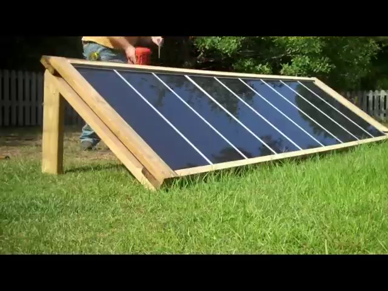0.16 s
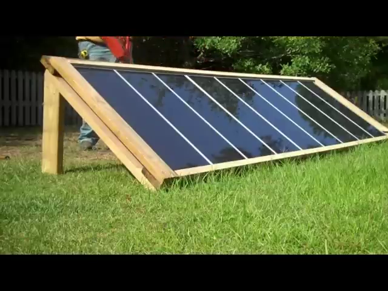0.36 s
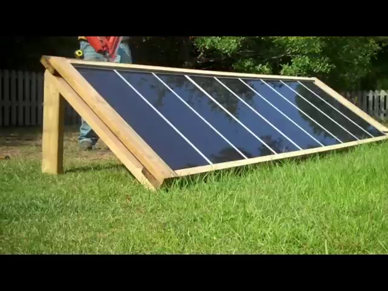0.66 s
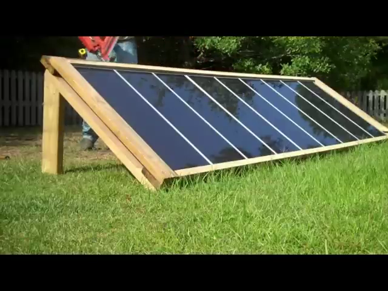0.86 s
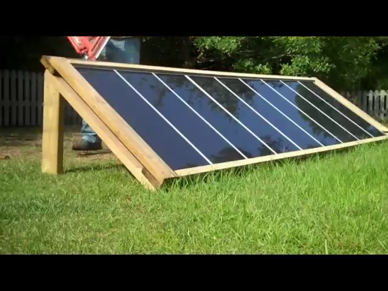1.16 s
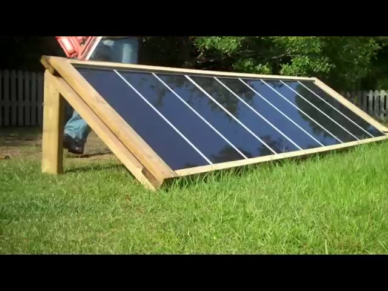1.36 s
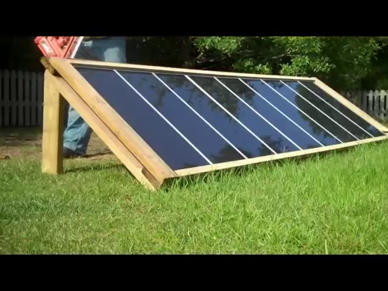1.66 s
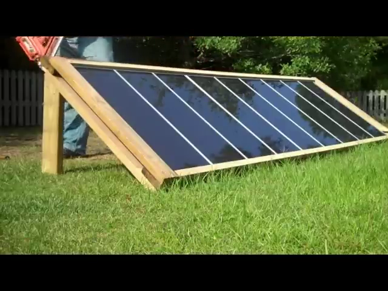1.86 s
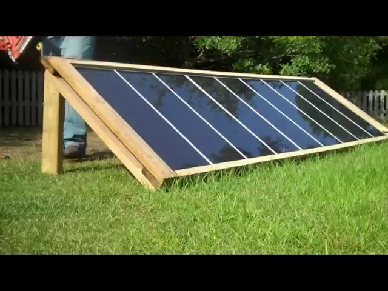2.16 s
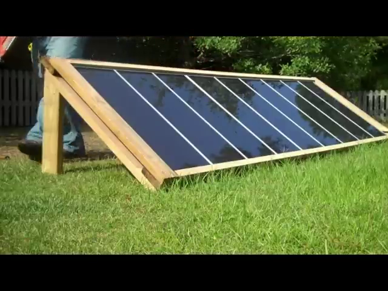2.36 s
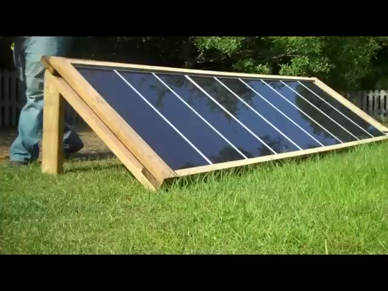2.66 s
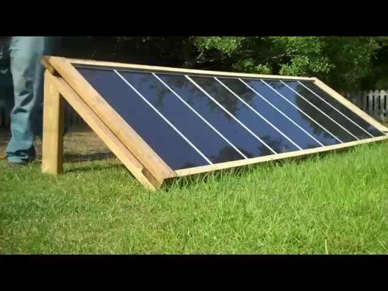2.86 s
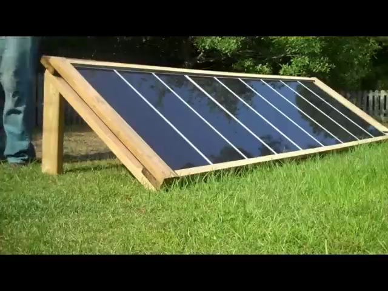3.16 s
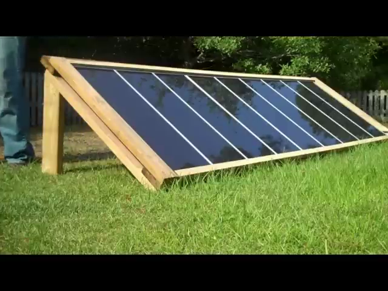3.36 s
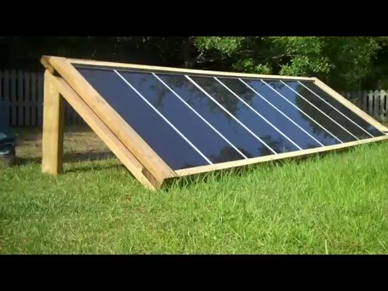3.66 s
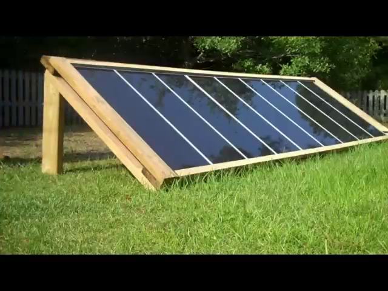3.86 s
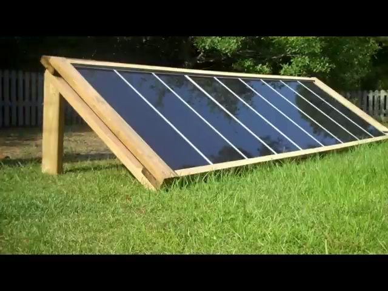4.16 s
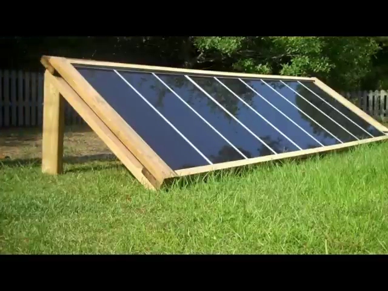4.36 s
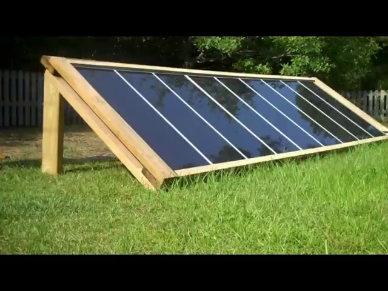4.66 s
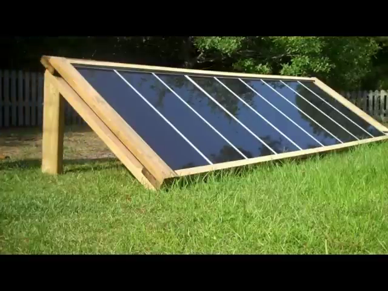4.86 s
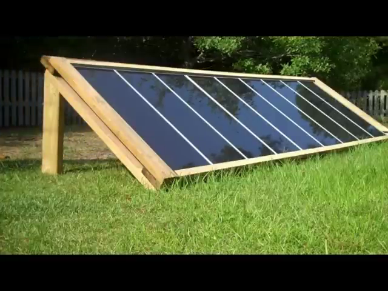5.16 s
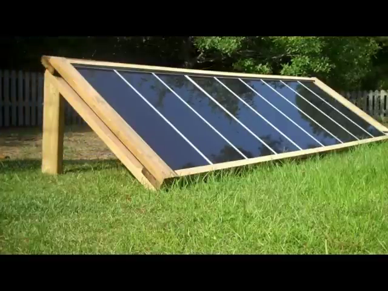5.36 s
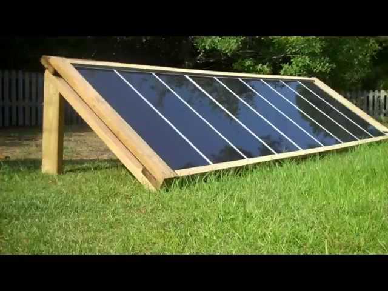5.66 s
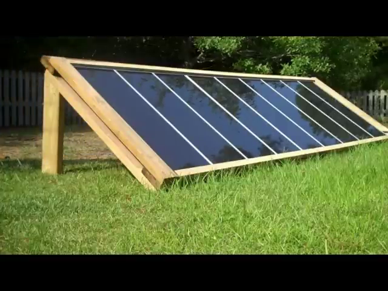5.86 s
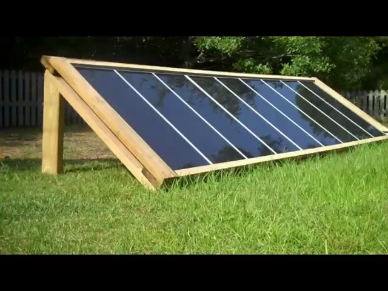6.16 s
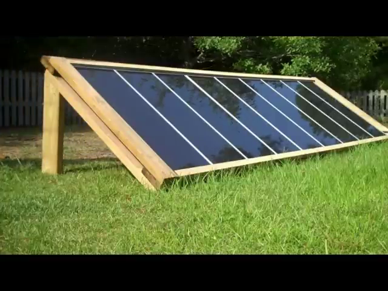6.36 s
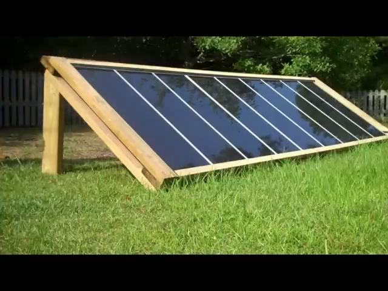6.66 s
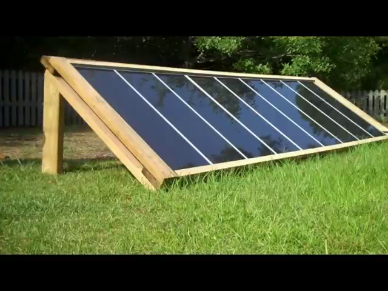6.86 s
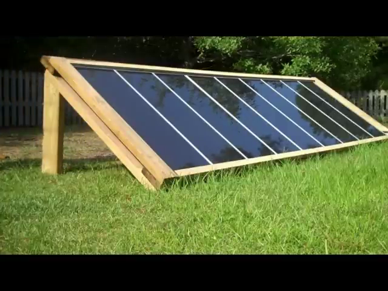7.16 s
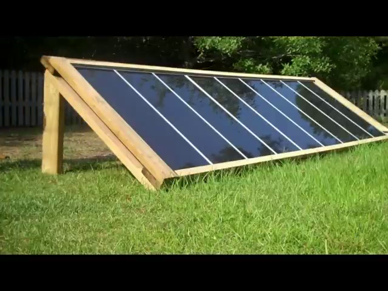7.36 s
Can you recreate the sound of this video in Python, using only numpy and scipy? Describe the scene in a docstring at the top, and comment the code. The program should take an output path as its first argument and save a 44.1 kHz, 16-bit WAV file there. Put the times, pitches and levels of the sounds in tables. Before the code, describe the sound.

A calm backyard with faint hum, hiss and high insect-like singing. A small hard catch snaps early, then shoes swish lightly in grass. Wood and hard gear are handled: a quick knock, a fluttering rattle, a sharper clatter, and finally two strong bright double clacks close together, with loose rattles after. The sound is dry, with a slight airy outdoor tail and treble-heavy microphones.

```python
"""On a lawn beside a timber-framed panel, someone walks off through the grass and handles wood and hard gear:
short scrapes, then two sharp double clacks with small rattles. Contacts are noise bursts exciting decaying
wood modes; scrapes and steps are dense random grains. Behind lie a distant outdoor hum, hiss, a thin whine
and an insect that stops; the two microphone capsules ring at different treble pitches."""
import sys
import numpy as np
from scipy import signal
from scipy.fft import rfft, irfft, next_fast_len
from scipy.io import wavfile
from scipy.ndimage import map_coordinates

SR = 44100
rng = np.random.default_rng(int(sys.argv[2]) if len(sys.argv) > 2 else 0)


def to_wav(sig):
    """Store sig (one row per channel, or 1-D mono) as 16-bit WAV at the path in sys.argv[1].

    Samples outside -1..1 are clipped; the rate is SR.
    """
    pcm = np.clip(np.atleast_2d(sig), -1, 1) * 32767
    pcm = np.round(pcm).astype(np.int16)
    wavfile.write(sys.argv[1], SR, pcm.T)  # frames by channels


N = 330485  # length in samples


def amp(db):
    """Amplitude ratio of a level: twenty decibels per factor of ten."""
    return 10 ** (np.asarray(db) / 20)


def decay(t, t60_s):
    """Exponential decay: the level falls 60 dB in t60_s."""
    return amp(-60 * t / t60_s)


def unit(x):
    """Normalization to an rms of 1."""
    return x / np.sqrt(np.mean(x ** 2) + 1e-20)


def along(points, hz):
    """Interpolation of (frequency_hz, value) points on a logarithmic frequency axis."""
    point_hz, value = np.transpose(points)
    return np.interp(np.log(hz + 1), np.log(point_hz + 1), value)


def curve(rows):
    """Linear interpolation of (time_s, value) rows, one value per sample."""
    return np.interp(np.arange(N) / SR, *np.transpose(rows))


def wobble(rate):
    """Slow random modulation: a smooth curve through random knots, rate of them a second."""
    knots = rng.standard_normal(int(N * rate / SR) + 4)
    return map_coordinates(knots, [np.arange(N) * rate / SR])


def filtered(x, response):
    """Linear filtering: the spectrum is multiplied by a complex response of frequency."""
    n = x.shape[-1]
    padded = next_fast_len(n + 4096, True)
    hz = np.fft.rfftfreq(padded, 1 / SR)
    return irfft(rfft(x, padded) * response(hz), padded)[..., :n]


def coloured(x, spectrum):
    """Spectral shaping by (frequency_hz, level_db) points, then normalization to rms 1."""
    return unit(filtered(x, lambda hz: amp(along(spectrum, hz))))


def placed(x, lead_ms):
    """Interaural-style time difference: the left leads the right by lead_ms (negative: right leads)."""
    sides = np.array([[1], [-1]])
    return filtered(x, lambda hz: np.exp(1j * np.pi * hz * lead_ms / 1000 * sides))


def band(centre_hz, width_hz):
    """Band-limited noise: independent on each side, with a bell-shaped response, at rms 1."""
    bell = lambda hz: 1 / (1 + ((hz - centre_hz) / width_hz * 2) ** 2)
    return unit(filtered(rng.standard_normal((2, N)), bell))


def strokes(rows):
    """Amplitude envelope: a half-sine swell for each (start_s, length_s, level_db) row."""
    t = np.arange(N) / SR
    swell = lambda start, length: np.sin(np.pi * np.clip((t - start) / length, 0, 1))
    return sum(amp(db) * swell(start, length) for start, length, db in rows)


def grains(rate, spread_db):
    """Random impulses: tiny catches of uneven size, on average rate of them a second."""
    struck = rng.random(N) < rate / SR
    return struck * rng.standard_normal(N) * amp(spread_db * rng.random(N))


def add(track, start_s, sound):
    """Superposition: mix a sound into the track, cut at the track's end."""
    part = track[:, round(start_s * SR):][:, :sound.shape[-1]]
    part += sound[:, :part.shape[-1]]


def near(hz, centre_hz, octaves):
    """Resonance bell: Gaussian in octaves about a centre."""
    return np.exp(-(np.log2((hz + 1) / centre_hz) / octaves) ** 2)


def contact_snap(t, hard_db, soft_db, centre_hz, t60_s):
    """Contact stiffness sets brightness: chattering noise, as rows for direct, left and right sound."""
    # colour of the snap: frequency_hz, density_db
    snap_colour = [(100, -24), (500, -8), (1100, 3), (2400, -2), (2900, 2), (3280, 2), (3800, 0),
                   (4900, 0.5), (6100, 2), (7100, -1), (8500, 0), (11000, 2), (13500, 10), (15500, -19)]
    # scattering off nearby boards: frequency_hz, scattered_over_direct_db
    scattering = [(1000, -8), (2200, 1.5), (4000, -3.5), (6000, -1.5), (8500, -13), (12000, -4)]
    # the further the snap outweighs the wood, the harder and brighter the contact
    hardness_db_per_octave = -3 + 6.5 * np.tanh((hard_db - soft_db) / 9.5)

    def response(hz):
        tilt_db = hardness_db_per_octave * np.log2(np.clip(hz, 2500, 12000) / centre_hz)
        # the part that is touched adds one broad resonance
        touched_db = 9 * near(hz, centre_hz, octaves=0.19)
        turn = np.arctan(amp(along(scattering, hz)))
        shares = np.array([np.cos(turn), np.sin(turn), np.sin(turn)])
        return amp(along(snap_colour, hz) + tilt_db + touched_db) * shares

    chatter = unit(filtered(rng.standard_normal((3, len(t))), response))
    onset = 1 - np.exp(-t / (0.016 * t60_s))
    return amp(hard_db + 2) * onset * decay(t, t60_s) * chatter


def wood_body(t, soft_db, pitch_hz):
    """Modal excitation: a blow drives the modes near its favoured pitch most, with a dry crunch."""
    # modes of the struck wood: frequency_hz, level_db, t60_s
    wood_modes = [(110, -20, 0.03), (265, -10, 0.011), (560, -6, 0.012), (730, -19, 0.016),
                  (860, -2, 0.021), (981, -3, 0.037), (1208, 5, 0.024), (1356, -9, 0.036),
                  (1463, -2, 0.031), (1610, -2.5, 0.036), (1685, -5, 0.03), (1920, -3, 0.035),
                  (2110, -11, 0.033), (2330, -8, 0.044), (3220, -2, 0.031)]
    # dry crunch of the wood under a blow: frequency_hz, density_db
    crunch_colour = [(60, -10), (200, -3), (380, -11.5), (560, -1), (800, -2), (1000, -9), (1250, -9),
                     (1650, -2), (2100, -5), (3200, -5), (5000, -15.5)]
    mode_hz, mode_db, mode_t60_s = np.transpose(wood_modes)[:, :, None]
    # modes above the favoured pitch are driven less, by 2 dB per octave
    octaves_above = np.log2(np.maximum(mode_hz / pitch_hz, 1))
    drive_db = 13 * near(mode_hz, pitch_hz, octaves=0.16) - 2 * octaves_above
    size = amp(mode_db + drive_db + rng.normal(0, 2.9, mode_hz.shape))
    # the grip shifts each mode slightly from blow to blow
    shifted_hz = mode_hz * (1 + 0.0038 * rng.standard_normal(mode_hz.shape))
    swing = np.sin(2 * np.pi * (shifted_hz * t + rng.random(mode_hz.shape)))
    ring = (size / np.linalg.norm(size) * swing * decay(t, mode_t60_s)).sum(0)
    crunch = coloured(rng.standard_normal(len(t)), crunch_colour) * decay(t, 0.026)
    onset = 1 - np.exp(-t / 0.0012)
    return amp(soft_db) * (amp(5.5) * ring + amp(-7.5) * crunch) * onset


def knocks():
    """Impact sound: each contact sums a brief snap with the wood modes it excites."""
    # knocks, clacks, snags, rattles: start_s, snap_db, wood_db, favoured_pitch_hz, snap_centre_hz, snap_t60_s
    contacts = [ (0.6156, -46, -37, 1300, 3400, .02), (0.6258, -47, -41, 1600, 3400, 0.037),
                (.658, -51, -43.5, 1760, 3400, .018), (1.717, -60, -45, 1510, 3000, .026),
                (3.9315, -39.5, -33, 1240, 3400, 0.023), (3.9412, -32, -29, 1130, 3270, 0.026),
                (3.9621, -41, -30, 1100, 3220, 0.024), (3.969, -50, -37, 1210, 3200, .026),
                (4.005, -42, -38, 970, 5100, 0.02), (4.299, -46.5, -41.5, 1370, 2600, 0.044),
                (4.316, -46, -48, 1700, 3400, .026), (4.326, -46, -45, 1220, 5700, 0.023),
                (4.342, -42, -42, 1000, 5300, 0.014), (4.3602, -47, -43, 1220, 2500, .035),
                (4.372, -47, -42, 1140, 5400, .018), (4.384, -40.5, -42, 1220, 5200, 0.016),
                (4.395, -44, -50, 1220, 5300, 0.028), (4.424, -46, -48, 1220, 5000, .04),
                (4.435, -47, -48, 1220, 5100, 0.048), (4.452, -47, -39.5, 1200, 2500, 0.032),
                (4.465, -51, -42, 1000, 3200, 0.022), (4.991, -39.5, -36, 1070, 7200, 0.014),
                (5.013, -46, -42, 1000, 4500, 0.017), (5.058, -34, -38.5, 1470, 7500, 0.033),
                (5.069, -31, -34, 1100, 7100, 0.015), (5.074, -33.5, -45, 1500, 6800, 0.034),
                (5.093, -36, -43, 1160, 8200, 0.026), (5.107, -42, -40.5, 1000, 8300, .02),
                (5.116, -44, -48, 1000, 8300, .02), (5.444, -63, -35, 890, 1500, .026),
                (5.4873, -49.5, -37, 1000, 6900, .026), (5.5214, -32, -37, 1700, 7650, 0.049),
                (5.531, -38, -30.5, 1550, 3300, 0.035), (5.5448, -23, -20, 1680, 2180, 0.021),
                (5.562, -41, -35, 1220, 2600, .026), (5.568, -38, -47, 1220, 7200, .022),
                (5.58, -27.5, -30.5, 2050, 8450, 0.014), (5.588, -39, -34, 950, 8800, 0.047),
                (5.5946, -14, -23, 2240, 8800, .024), (5.5967, -16, -11.5, 1190, 6100, 0.028),
                (5.619, -37, -39, 1220, 9000, 0.04), (5.6590, -33.5, -49, 1500, 3500, 0.032),
                (5.6995, -35, -46, 1200, 6040, 0.014), (6.026, -55, -35, 980, 3000, .026),
                (6.0925, -39, -25, 1490, 5200, 0.018), (6.095, -22.5, -27.5, 1500, 8250, 0.03),
                (6.117, -32, -37, 1120, 8600, 0.027), (6.128, -52, -35, 1250, 2600, .026),
                (6.134, -39, -41, 1200, 8500, .026), (6.1437, -27, -23.5, 1480, 5900, .026),
                (6.1447, -15.5, -23, 1020, 8050, 0.019), (6.169, -33, -56, 1150, 8600, .012),
                (6.18, -37, -36.5, 1160, 8500, .03), (6.209, -28, -49, 1150, 7900, 0.0082),
                (6.2473, -46, -49, 1150, 6500, 0.035), (6.8172, -44, -40.5, 895, 3300, 0.016),
                (6.9975, -46, -41.5, 2320, 5300, 0.027), (7.279, -50, -48, 1400, 2600, .026)]
    out, t = np.zeros((2, N)), np.arange(SR // 12) / SR
    for start, hard_db, soft_db, pitch_hz, centre_hz, t60_s in contacts:
        snap = contact_snap(t, hard_db, soft_db, centre_hz, t60_s)
        body = wood_body(t, soft_db, pitch_hz)
        direct, scattered = snap[0], snap[1:]
        add(out, start, placed(direct + body, lead_ms=0.04) + scattered)
    return out


def clicks():
    """Free vibration: a hard catch on a hand tool snaps and rebounds, ringing in its own modes."""
    # clicks of the catch: start_s, level_db
    snaps = [(0.6146, -20), (0.6266, -30)]
    # modes of the catch: frequency_hz, level_db, t60_s
    catch_modes = [(1730, -16.5, 0.016), (3380, -19.5, .018), (5700, -14.5, 0.0085), (6030, -13, 0.0073),
                   (6650, -12, 0.009), (7900, -24, .008), (9200, -5.5, 0.0084), (10840, 0.5, 0.0077),
                   (12100, -2, .007)]
    out, t = np.zeros((2, N)), np.arange(SR // 20) / SR
    hz, db, t60_s = np.transpose(catch_modes)[:, :, None]
    for start, level_db in snaps:
        swing = np.sin(2 * np.pi * (hz * t + rng.random(hz.shape)))
        ring = (amp(db) * decay(t, t60_s) * swing).sum(0)
        # differencing tilts the noise towards the treble
        tick = decay(t, 0.004) * unit(np.diff(rng.standard_normal(len(t) + 1)))
        add(out, start, amp(level_db) * placed(ring + amp(-17) * tick, lead_ms=0.022))
    return out


def slides():
    """Stick-slip friction: rough wood catches and slips, densely enough to merge into a rub."""
    # wood sliding on wood: start_s, length_s, level_db
    rubs = [(1.649, 0.12, -53), (3.916, 0.12, -44.5), (4.29, 0.15, -44), (4.404, 0.1, -46),
            (4.97, 0.061, -44.5), (5.049, 0.074, -46.5), (5.512, 0.13, -42), (6.056, 0.13, -40)]
    # colour of the rub: frequency_hz, density_db
    rub_colour = [(200, -18), (650, -3), (1000, 6.5), (1240, 6.5), (1480, 0), (1950, -3.5), (2450, 6),
                  (2800, 2), (3200, 1), (3900, -4.5), (5300, -6), (6500, -12), (8000, -11.5), (14000, -18)]
    catches = grains(rate=2200, spread_db=12) * amp(2.2 * wobble(170))
    rub = placed(coloured(catches, rub_colour), lead_ms=0.034)
    diffuse = coloured(rng.standard_normal((2, N)), rub_colour)
    return strokes(rubs) * (rub + amp(-9) * diffuse)


def steps():
    """Granular excitation: blades of grass flick against shoes at random instants."""
    # steps brushing the grass: start_s, length_s, level_db
    brushes = [(2.36, 0.39, -55.5), (3.14, 0.28, -52.5), (3.7, 0.52, -54), (4.73, 0.17, -52.5),
               (7.33, 0.2, -53)]
    # colour of the grass: frequency_hz, density_db
    grass_colour = [(500, -20), (2000, 0), (6000, -5.5), (9000, -3.5), (14000, -1.5)]
    flicks = np.array([grains(rate=5000, spread_db=2) for side in range(2)])
    return strokes(brushes) * coloured(flicks, grass_colour) * amp([[0], [-3]])  # left, right


def yard(x):
    """Diffuse reverberation: fence and trees answer with noise whose decay depends on frequency."""
    # decay of the yard: frequency_hz, t60_s
    yard_decay = [(200, 0.11), (1500, 0.14), (3500, 0.57), (8000, 0.52), (14000, 0.48)]
    hz, t, z = signal.stft(rng.standard_normal((2, SR // 2)), SR, nperseg=256)
    fading = z * decay(t, along(yard_decay, hz)[:, None])
    tail = signal.istft(fading, SR, nperseg=256)[1]
    return signal.fftconvolve(x[None], tail / np.linalg.norm(tail[0]), axes=1)[:, :N]


def puff():
    """Wind-induced pressure: light air brushing the microphones gives low-frequency noise."""
    # soft puffs of air: start_s, length_s, level_db
    puffs = [(.92, 0.16, -58), (2.72, 0.15, -69), (2.925, 0.08, -55)]
    return (strokes(puffs) + amp(-82.5)) * band(centre_hz=48, width_hz=56)


def whine():
    """Frequency and amplitude modulation: thin sines whose phases and levels waver."""
    # partials of the whine: frequency_hz, relative_level_db
    partials = [(5631, -66), (5809, -67), (5922, -62.5), (6100, -68), (6277, -69), (6395, -67), (6686, -67),
                (7332, -63)]
    t = np.arange(N) / SR
    sines = 0
    for hz, db in partials:
        level = amp(db + 1.3 * wobble(2.12))
        sines = sines + level * np.sin(2 * np.pi * hz * t + 0.97 * wobble(8))
    return amp(-5) * placed(sines, lead_ms=-0.13) * amp([[-11], [0]])  # left, right


def insect():
    """Narrow-band noise: one insect's high note fades and falls silent."""
    # fading of the insect: time_s, level_db
    fading = [(0, -71), (1.2, -71), (2.2, -75), (2.4, -92)]
    return amp(curve(fading)) * band(centre_hz=7840, width_hz=330) * amp([[0], [-3]])  # left, right


def high_singing():
    """Band-limited noise: steady high singing in separate bands."""
    # bands of singing: centre_hz, width_hz, relative_level_db
    singing_bands = [(3243, 31, -69.5), (6300, 1200, -69)]
    singing = sum(amp(db) * band(hz, width) for hz, width, db in singing_bands)
    return singing * amp([[-6], [1]])  # left, right


def distant_hum():
    """Partial coherence: a shared hum plus a part independent on each side, strongest in the deep bass."""
    # colour of the hum: frequency_hz, density_db
    hum_colour = [(20, -23), (45, -12), (75, 0.5), (100, -2.5), (135, 1.5), (190, -2), (300, -2.5),
                  (430, -6), (800, 0), (1100, -3.5), (1600, -8.5), (2500, -13), (6000, -27)]
    # course of the hum: time_s, relative_level_db
    hum_course = [(0.0, -54.5), (0.96, -55), (5.01, -53), (7.49, -53.5)]
    # part that differs from side to side: frequency_hz, gain_db
    separate_part = [(30, 0), (70, -7.5), (150, -14), (400, -9), (900, -14.5), (3000, -10)]
    shared = placed(coloured(rng.standard_normal(N), hum_colour), lead_ms=-0.11)
    separate = coloured(rng.standard_normal((2, N)), hum_colour)
    separate = filtered(separate, lambda hz: amp(along(separate_part, hz)))
    return amp(curve(hum_course) + 2 + 0.36 * wobble(4.11)) * (shared + separate)


def wide_hiss():
    """Incoherent noise: a hiss independent on each side sounds wide."""
    # colour of the hiss: frequency_hz, density_db
    hiss_colour = [(20, -24), (150, -12), (600, -5.5), (2000, 1.5), (4000, 1.9), (5500, -0.5), (7000, -5),
                   (9000, -8), (11000, -9.5), (14000, -4), (14400, -48)]
    hiss = coloured(rng.standard_normal((2, N)), hiss_colour) * amp([[-.7], [.7]])  # left, right
    return amp(-55.5 + 0.25 * wobble(2.64)) * hiss


def scene():
    """Superposition: handling and its answer from the open yard, steps, air and background."""
    # sounds from the left reach the right port with less of the top: frequency_hz, gain_db
    right_dulling = [(7000, -0.5), (9500, -5), (11500, -10), (14000, -23)]
    handling = knocks() + clicks() + slides()
    handling = filtered(handling, lambda hz: amp([0 * hz, along(right_dulling, hz)]))
    answer = amp([[-14.5], [-17.5]]) * yard(handling.mean(0))  # left, right
    background = distant_hum() + wide_hiss() + whine() + high_singing() + insect()
    return handling + answer + steps() + puff() + background


def record(dry):
    """Damped resonance: each capsule peaks at its own pitch and falls off above; loud peaks clip."""
    # capsules, left then right: resonance_hz, width_hz
    capsule_modes = [(7950, 1100), (6564, 1175)]
    capsules = lambda hz: np.array([c * c / (c * c - hz * hz + 1j * hz * w) for c, w in capsule_modes])
    clipped = np.clip(filtered(dry, capsules), -1, .95)
    return filtered(clipped, lambda hz: 1 / (1 + (hz / 15500) ** 80))  # steep cutoff at 15500 Hz


dry = scene()
out = record(dry)
to_wav(out)
```